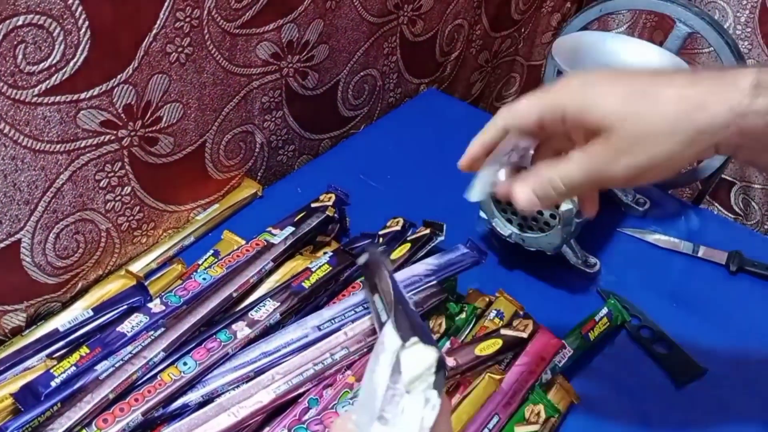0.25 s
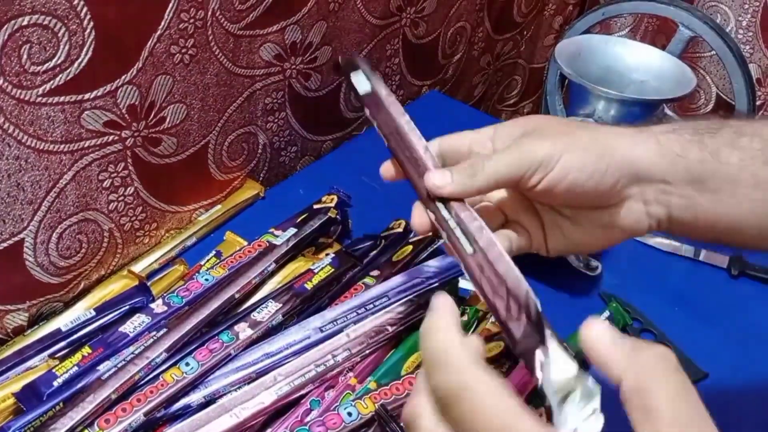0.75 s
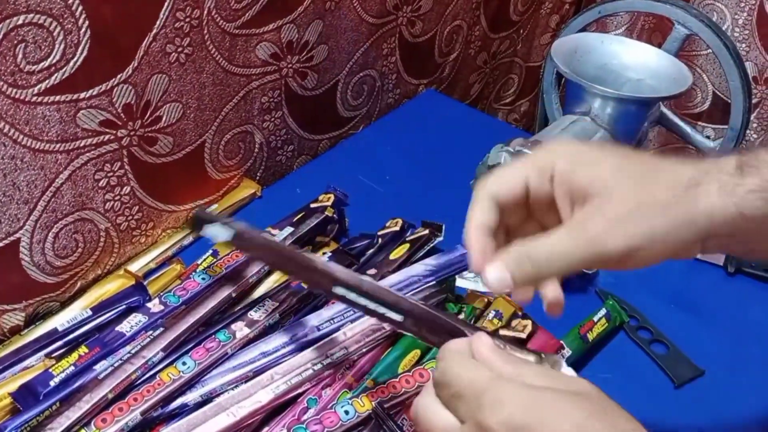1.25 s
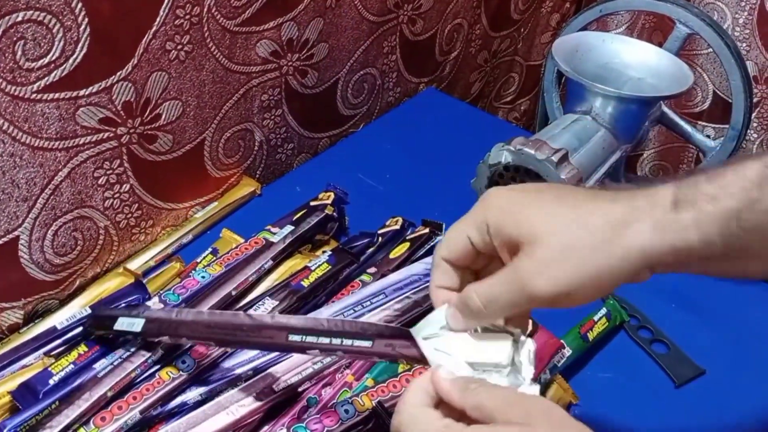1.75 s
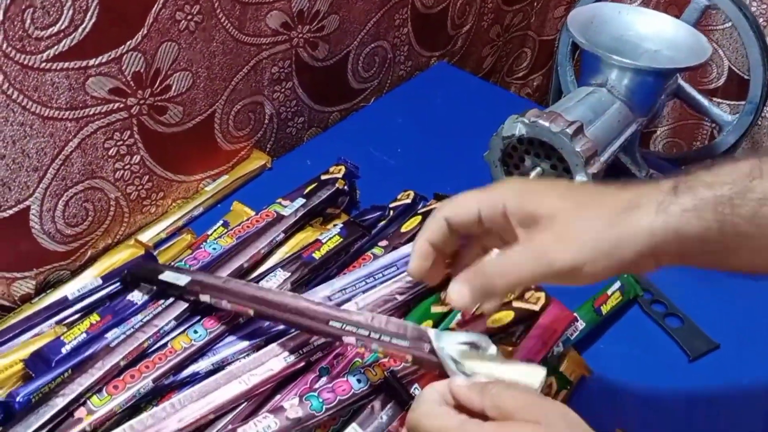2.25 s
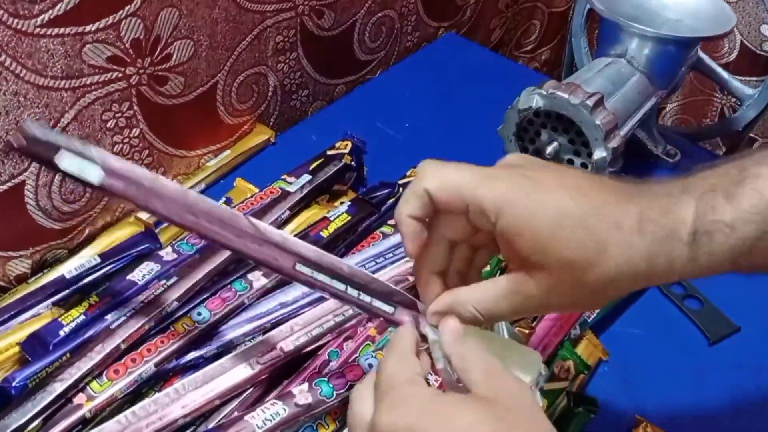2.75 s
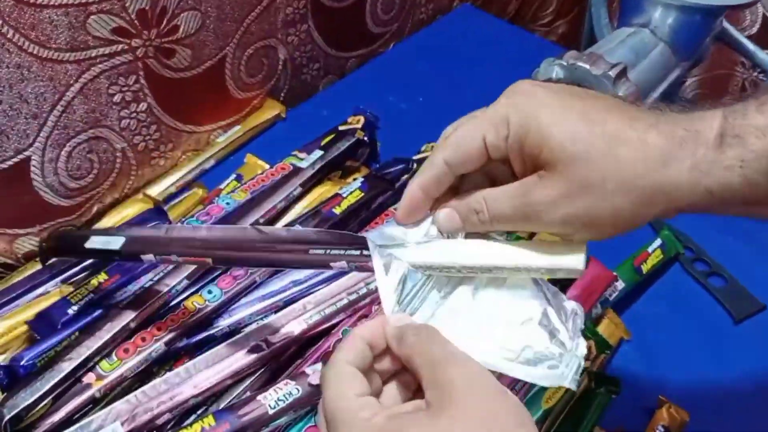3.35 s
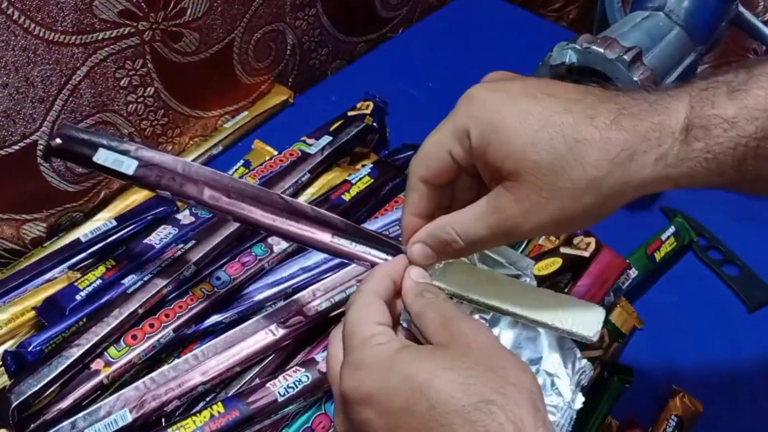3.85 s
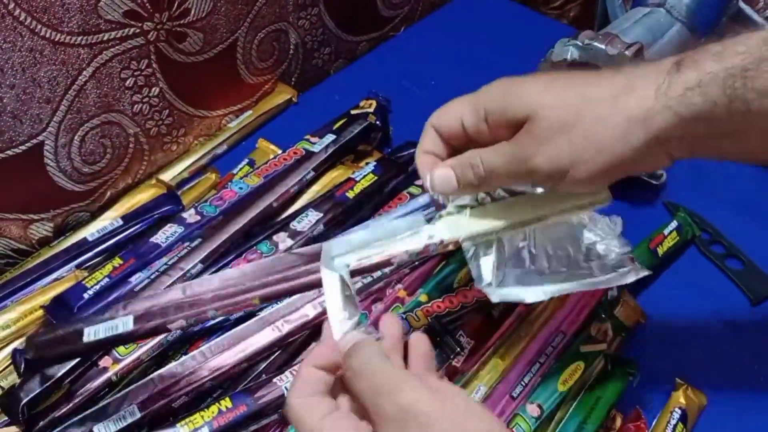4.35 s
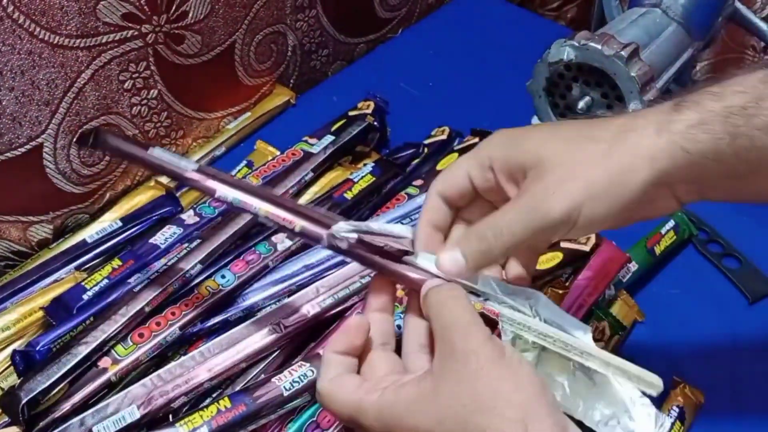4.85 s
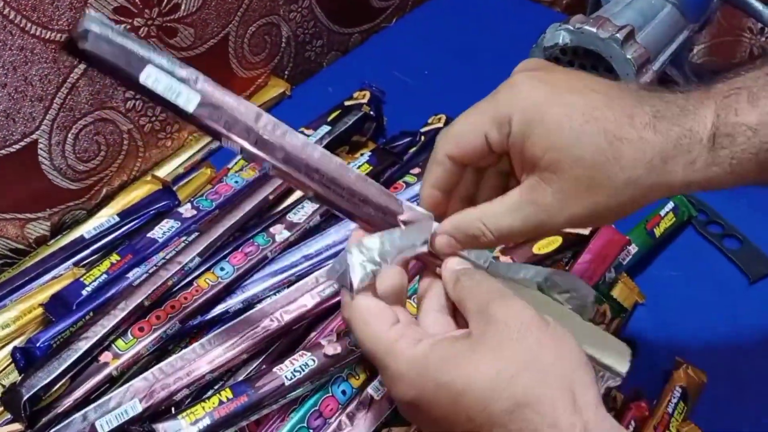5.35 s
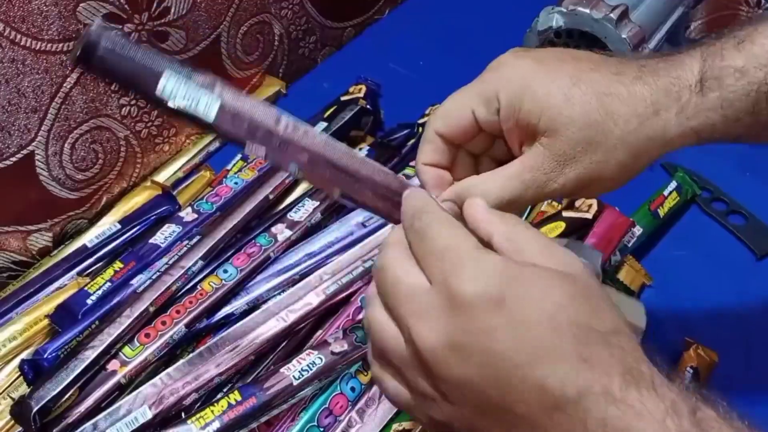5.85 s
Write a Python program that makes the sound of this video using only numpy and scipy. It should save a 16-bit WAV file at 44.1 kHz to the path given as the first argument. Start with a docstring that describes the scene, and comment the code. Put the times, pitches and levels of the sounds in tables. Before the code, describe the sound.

Thin foil snaps, crinkles and rips in uneven handfuls, dry and near. Early crackles are bright and taut; later ones gain a hollow papery flap as the sheet hangs loose. Two strong bursts of tearing fall in the middle, with brief rubbing of fingers between. The end is quiet and sparse, with small bumps and faint squeaks above low room noise.

```python
"""Foil wrapper peeled by hand off a long wafer stick, close to a phone in a small furnished room.
Creases snap as short noise kicks through facet and sheet resonances; pulls and tears release showers
of tiny kicks, and the loose sheet adds a papery body. Behind them an open pouch rings low, fingers
bump and rub as damped swings and soft noise, and faint squeaks are wavering sines.
At the back lie a hum of wavering pitch and level, low rumble and swells, and faint room noise."""
import sys
import numpy as np
from scipy import signal
from scipy.fft import rfft, irfft
from scipy.io import wavfile
from scipy.ndimage import uniform_filter1d, map_coordinates

SR = 44100
rng = np.random.default_rng(int(sys.argv[2]) if len(sys.argv) > 2 else 0)


def unload_wav(signal):
    """Save mono or channel-first audio to the path in sys.argv[1] as 16-bit WAV at rate SR, clipped to [-1, 1]."""
    wavfile.write(
        sys.argv[1],
        SR,
        np.round(np.clip(np.atleast_2d(signal).T, -1, 1) * 32767).astype(np.int16),
    )


N = 269892
T = np.arange(N) / SR  # s


def undb(db):
    """Decibels to gain."""
    return 10 ** (np.asarray(db) / 20)


def unit(x):
    """Scale to rms 1."""
    return x / np.sqrt(np.mean(x ** 2))


def fade(t, t60):
    """Exponential decay, 60 dB down at t60 seconds."""
    return np.exp(-np.log(1000) * t / t60)


def span(start, end, attack_s=0.0095, release_s=0.019):
    """Attack before start, hold, and release after end."""
    return np.interp(T, [start - attack_s, start, end, end + release_s], [0, 1, 1, 0])


def add(out, s, x):
    """Mix x into out from time s on."""
    i = max(int(s * SR), 0)
    out[i:i + len(x)] += x[:max(N - i, 0)]


def convolve(x, response):
    """Filter x, keeping its length."""
    return signal.fftconvolve(x, response)[:len(x)]


def lowpass(order, hz):
    """Butterworth sections that cut the top."""
    return signal.butter(order, hz, fs=SR, output="sos")


def impulse(points, size=512):
    """Minimum-phase response of unit energy with a (f/Hz, level/dB) colour."""
    hz, db = np.transpose(points)
    bins = np.maximum(np.arange(size + 1) * SR / (2 * size), 1)
    gains = undb(np.interp(np.log(bins), np.log(hz), db))
    # folding the cepstrum forward in time makes the response causal
    cepstrum = irfft(np.log(gains))
    cepstrum[1:size] *= 2
    cepstrum[size + 1:] = 0
    h = irfft(np.exp(rfft(cepstrum)))[:size]
    return h / np.linalg.norm(h)


def resonate(x, hz, q):
    """One resonance, gain 1 at its centre."""
    return signal.lfilter(*signal.iirpeak(min(hz, SR / 3), max(q, .5), fs=SR), x)


def resonate_twice(x, hz, q):
    """Two equal resonances in series: a narrow band with a soft onset."""
    return resonate(resonate(x, hz, q), hz, q)


def walk(rate):
    """Smooth random curve of rms 1, with a new target rate times a second."""
    k = int(SR / rate)
    steps = np.repeat(rng.standard_normal(N // k + 1), k)
    return unit(uniform_filter1d(steps, k)[:N])


def buckle(t, skid_db, skid_t60):
    """One crease gives way: a kick, then a brief noisy skid as the fold runs on."""
    push = undb(skid_db) * rng.standard_normal(len(t)) * fade(t, skid_t60)
    push[0] += 1
    return push


def facet_ring(x, hz, q):
    """A stiff facet swells for a cycle or two and rings briefly, in a narrow band."""
    return resonate_twice(x, hz, q)


# papery note of the sheet, which moves as the hands reshape it: t/s, f/Hz
SHEET_NOTE = [(0, 2306), (.11, 2250), (.15, 1598), (.3, 1657), (.5, 2092), (.75, 2100), (.89, 2483),
              (1.25, 1607), (1.4, 2010), (1.5, 1752), (1.75, 1783), (1.95, 1653), (2.3, 1698), (2.6, 1837),
              (2.7, 1600), (2.81, 1810), (3.2, 1751), (3.35, 1631), (3.55, 1546), (3.78, 1701),
              (4.08, 1758), (4.24, 1580), (4.38, 1777), (4.67, 1650), (4.81, 1890), (4.91, 1602),
              (5.13, 1911), (5.8, 1656), (6.12, 1550)]
SHEET_HZ, SHEET_FOLLOW = 1715.6, 1.1  # note at which SHEET holds [Hz]; exponent on the note's ratio to it


def sheet_shift(t):
    """Factor on all resonances of the sheet at time t: bending the foil moves them together."""
    return (np.interp(t, *np.transpose(SHEET_NOTE)) / SHEET_HZ) ** SHEET_FOLLOW


# single creases snapping, loud and faint, close in:
# t/s, level/dB before trim, facet ring f/Hz, body level/dB re ring before trim
SNAPS = [(.0113, -52.5, 5550, -14), (.0919, -39, 4530, -34), (.1138, -38, 6000, -29),
         (.1317, -40.5, 6200, -25), (.1512, -30, 5330, -12.5), (.2517, -44.5, 5500, -30),
         (.2704, -53, 6300, -9), (.4283, -46, 4400, -14), (.4485, -57, 6900, -18),
         (.5148, -46.5, 5500, -21), (.5582, -59, 5200, -26), (.69, -48, 3600, -32), (.748, -46, 5570, -41),
         (.764, -44, 4580, -44), (.7822, -45, 5700, -21), (.8717, -52, 5500, -8), (.8918, -48.5, 5660, -4),
         (.9897, -56, 5200, -22), (1.0696, -49.5, 6600, -25), (1.095, -53, 7000, -20),
         (1.224, -42, 4400, -49), (1.2346, -45, 5000, -11), (1.2465, -45.5, 5500, -30),
         (1.3669, -41.5, 6350, -26.5), (1.4108, -49.5, 6340, -27), (1.4833, -44.5, 4120, -44),
         (1.5053, -36, 5296, -43), (1.5595, -59, 4900, -34), (1.5708, -34.5, 4200, -8.5),
         (1.59, -37, 3940, -13), (1.6187, -41.5, 5860, -32), (1.7084, -45, 4906, -33),
         (1.7238, -47, 5100, -34), (1.8112, -49, 6000, -24), (1.8198, -33, 4730, -24),
         (1.835, -40.5, 5560, -25), (1.852, -42, 5400, -21), (1.858, -38, 5230, -19),
         (1.866, -39, 5500, -13), (1.8737, -36.5, 5990, -16), (1.893, -39, 5120, -24),
         (1.899, -38, 5300, -18), (1.921, -37, 6200, -30), (1.932, -40, 5587, -23),
         (1.939, -34.5, 5040, -14.5), (1.952, -40, 5200, -9.5), (1.966, -39, 5400, -28),
         (1.9949, -32.5, 4670, -9.5), (2.005, -45, 5200, -8), (2.012, -38, 6370, -6.5),
         (2.0797, -33.5, 6100, -7.5), (2.0872, -36.5, 6240, -13), (2.1261, -41, 4330, -22),
         (2.1536, -41.5, 5650, -15), (2.193, -49, 5900, -21), (2.2386, -52, 5300, -22),
         (2.245, -44, 4535, -29), (2.265, -43.5, 5340, -19), (2.272, -41, 6255, -7.5),
         (2.4547, -46.5, 4170, -20), (2.4729, -55, 4840, -22), (2.5422, -48.5, 5300, -5),
         (2.584, -49.5, 3677, -26), (2.6195, -53, 4660, -28), (2.685, -57, 4870, -26),
         (2.69, -36.5, 4610, -5), (2.7897, -43.5, 4323, 2), (2.7959, -42.5, 5480, -15),
         (2.873, -43.5, 5200, -4.5), (2.8785, -49, 5200, -2), (2.8868, -52, 4800, -3),
         (2.9375, -54.5, 4450, -4), (3.0823, -41, 4530, -28), (3.0947, -37.5, 4960, -18),
         (3.1182, -35.5, 5300, -19), (3.1362, -40, 4750, -21), (3.145, -33.5, 5700, -11),
         (3.1618, -32, 5200, -27), (3.1868, -38, 4800, 2), (3.216, -49, 4792, 8), (3.2751, -34.5, 4700, -3),
         (3.2887, -32, 5240, -5.5), (3.3019, -33.5, 5045, -12), (3.3369, -35, 5000, -18),
         (3.3579, -33, 4777, -6), (3.3713, -32, 4600, -7.5), (3.4146, -38.5, 4940, 0.5),
         (3.5424, -41, 4690, -6), (3.561, -46, 4930, -1), (3.5714, -57, 5100, -6), (3.5973, -48, 4900, -10),
         (3.6497, -43.5, 4837, -3.5), (3.694, -63, 4930, -7), (3.7145, -42.5, 4714, -16),
         (3.7323, -39.5, 4800, -32), (3.7599, -40.5, 4510, -24), (3.7796, -38, 5415, -42),
         (3.7935, -41.5, 4970, -5), (3.8074, -33.5, 4635, -3.5), (3.9151, -48, 5100, -33),
         (3.9255, -44, 4840, -30), (3.9361, -46, 5500, -30), (3.974, -47.5, 7220, -23),
         (4.0323, -34.5, 5050, -33), (4.0604, -38, 5647, -12), (4.078, -33, 5100, -26),
         (4.0902, -30.5, 5063, -25), (4.1096, -33.5, 5000, -13.5), (4.137, -35, 5035, -28),
         (4.1825, -32, 5110, -8), (4.2251, -32, 5370, -7), (4.275, -32, 5206, -18),
         (4.2917, -44.5, 5000, -21), (4.3216, -41, 4574, -12), (4.3766, -40.5, 4348, -7.5),
         (4.4161, -43, 4687, -9.5), (4.4274, -53, 4700, -14), (4.5182, -49.5, 4441, -15),
         (4.5442, -53, 4800, -23), (4.5951, -56.5, 5500, -10), (4.566, -45, 4150, -16),
         (4.642, -39.5, 4310, -15), (4.651, -46, 4700, -18), (4.673, -47, 4700, -16),
         (4.6861, -35, 4950, -17), (4.6978, -44, 4700, -13), (4.7967, -43, 4890, -10),
         (4.8205, -58, 4200, -18), (4.8944, -51, 5400, -5), (4.9116, -44, 5267, -5),
         (5.0043, -52, 5400, -28), (5.027, -50, 5000, -10), (5.0455, -48.5, 4700, -7),
         (5.0958, -44.5, 4653, -21), (5.1446, -51, 5194, -6.5), (5.2151, -42.5, 5170, -26),
         (5.2221, -43.5, 5170, -17), (5.265, -54, 5400, -33), (5.279, -53, 5200, -32),
         (5.4843, -48.5, 5500, -15.5), (5.5234, -57.5, 5300, -21), (5.6, -66, 5000, -12),
         (5.621, -69, 4800, 0.5), (5.7521, -48.5, 5805, -10.5), (5.791, -58, 5300, -14),
         (5.806, -49, 5200, -8.5), (5.8188, -54, 4500, -15), (5.9461, -49, 4813, -18),
         (5.9919, -59, 5100, -18), (6.094, -42.5, 5550, -26), (6.104, -46, 5540, -15)]
# colour of the small stiff facets: f/Hz, relative level/dB
FACETS = [(700, -58.5), (1700, -17), (2400, -13), (2800, -5), (3250, -9.5), (4000, -3.5), (5000, -1),
          (6000, -3.5), (7300, -8), (8600, -16.5), (10500, -15.5), (12200, -22), (14000, -16.5),
          (16000, -27)]
# colour of the whole sheet flexing: f/Hz, relative level/dB
SHEET = [(50, -27), (200, -43), (450, -5.5), (750, -12), (1050, -8.5), (1350, 3.5), (1800, 9), (2300, -2.5),
         (2850, 3), (3500, -6), (7000, -31.5)]


def snaps(rows, ring_q=2.28, broad_db=-5, broad_slope=0.19, hard_db=-38, gain_db=-0.65,
          body_gain_db=-0.8, edge_db=1.0, echo_db=-12, echo_s=.003, spread_octaves=0.26,
          size=1024, count=145):
    """Each snap rings its facet, shakes its part of the sheet and trips a neighbouring crease."""
    out, t = np.zeros(N), np.arange(size) / SR
    for s, db, hz, body_db in rows:
        length, sharpness, place, lag, neighbour = rng.standard_normal(5)
        push = buckle(t, skid_db=-13, skid_t60=.007 * np.exp(.4 * length))
        # a sharper crease has more of the highest treble
        colour = [(f, gain + edge_db * sharpness * (f > 8000)) for f, gain in FACETS]
        crack = convolve(push, impulse(colour))
        # hard snaps crack over a wide band, gentle ones mostly ping
        wide_db = broad_db + broad_slope * min(db - hard_db, 0)
        ring = facet_ring(crack, hz, ring_q) + undb(wide_db) * crack
        shift = sheet_shift(s) * 2 ** (spread_octaves * place)
        body = convolve(push, impulse([(f * shift, gain) for f, gain in SHEET]))
        # levels are set over the first few milliseconds (count samples)
        ring = ring / ring[:count].std()
        body = undb(body_db + body_gain_db) * body / body[:count].std()
        add(out, s, undb(db + gain_db) * (ring + body))
        tripped = facet_ring(crack, hz * 2 ** (spread_octaves * neighbour), ring_q)
        tripped_s = s + echo_s * np.exp(.5 * lag)
        add(out, tripped_s, undb(db + echo_db) * tripped / tripped[:count].std())
    return out


# creases running on in a short, dense rip:
# t/s, length/s, level/dB before trim, ring f/Hz, body level/dB re ring before trim
RIPS = [(0.154, 0.0018, -31.5, 5330, -11), (0.701, .005, -52, 5585, -23), (1.054, 0.0061, -54, 6700, -27),
        (2.084, 0.0081, -42.5, 5793, -5), (2.264, 0.0057, -42, 5630, -10.5),
        (3.293, 0.0046, -35.5, 5295, -12), (3.368, .012, -35, 4775, -6), (3.414, 0.0051, -41.5, 4900, 2),
        (4.162, .01, -34.5, 5015, -15.5), (4.269, 0.0078, -35.5, 5103, -4), (5.222, .012, -47, 5200, -8),
        (6.086, .003, -48, 5520, -13)]


def rips(rate=900, each_db=-8.0, scatter_db=2, spread_octaves=0.21):
    """A crease runs on from facet to facet, a snap about every millisecond; rows like SNAPS."""
    rows = []
    for start, length, db, hz, body_db in RIPS:
        for k, (force, facet, lag) in enumerate(rng.standard_normal((20, 3))):
            if k / rate < length:
                s = start + (k + lag / 3) / rate
                ring_hz = hz * 2 ** (spread_octaves * facet)
                rows.append((s, db + each_db + scatter_db * force, ring_hz, body_db))
    return rows


# seam parting in a run of little pops: start t/s, end t/s, level/dB before trim, pops per s, ring f/Hz
PEELS = [(2.804, 2.842, -71, 120, 5060), (3.497, 3.529, -59, 124, 4850), (3.597, 3.637, -64.5, 124, 4925),
         (3.896, 3.943, -56, 115, 5200), (4.012, 4.03, -49.5, 127, 4910)]


def peels(scatter_db=2, jitter=.18, body_db=-17):
    """The seam lets go pop by pop, almost evenly; rows like SNAPS."""
    rows = []
    for s, end, db, rate, hz in PEELS:
        while s < end:
            force, gap = rng.standard_normal(2)
            rows.append((s, db + scatter_db * force, hz, body_db))
            s += np.exp(jitter * gap) / rate
    return rows


# hand moves that tear or crumple the foil:
# start t/s, end t/s, fine crackle level/dB before trim, body level/dB re crackle before trim
PULLS = [(0, 0.08, -59.5, -23), (0.104, 0.226, -52, -16.5), (0.249, 0.292, -57, -12),
         (0.424, 0.5, -66.5, -17), (0.512, 0.518, -68.5, -8.5), (0.708, 0.793, -52, -12.5),
         (0.963, 0.973, -67, -16), (1.044, 1.113, -67, -37), (1.149, 1.297, -65, -24),
         (1.235, 1.256, -53.5, -12.5), (1.362, 1.52, -61, -25), (1.471, 1.524, -57, -9),
         (1.569, 1.649, -52.5, -10.5), (1.708, 1.761, -54.5, -18.5), (1.844, 1.969, -47, -11.5),
         (2.033, 2.131, -50, -6.5), (2.235, 2.324, -49, -11), (2.458, 2.518, -52.5, -14),
         (2.588, 2.64, -57, -14), (2.692, 2.71, -60, -1.5), (2.791, 2.801, -55, -4),
         (2.873, 2.883, -66, -6), (3.002, 3.015, -60.5, -7.5), (3.118, 3.17, -42, -20.5),
         (3.153, 3.19, -42.5, -5), (3.206, 3.28, -46.5, -7), (3.278, 3.405, -43.5, -1.5),
         (3.524, 3.549, -52, -3), (3.718, 3.809, -51, -7.5), (3.911, 4.03, -68.5, -19),
         (4.053, 4.096, -38, -18.5), (4.139, 4.193, -38.5, -9), (4.231, 4.257, -40.5, -4.5),
         (4.29, 4.341, -47, -6.5), (4.375, 4.443, -61, -12.5), (4.564, 4.578, -58, -7),
         (4.645, 4.694, -49, -8), (4.759, 4.931, -62.5, -4), (4.899, 4.916, -57.5, -4.5),
         (5.021, 5.038, -60.5, -5), (5.092, 5.119, -68.5, -3), (5.219, 5.278, -63.5, -15.5),
         (5.482, 5.535, -69.5, -14.5), (5.602, 5.654, -75, -6), (5.75, 5.823, -66, -5.5),
         (5.936, 6.004, -68, -16), (6.059, 6.128, -68.5, -2), (6.081, 6.117, -58, -12)]
GRIP_DB_PER_S, SAG_DB_PER_S, RELEASE_DB_PER_S = 1507, 12.5, 329.5  # take hold, ease, let go
REST_DB, REST_BODY_DB = -83.5, -8.5  # foil that is merely held: crackle, body re crackle, before trim


def effort():
    """Crackle level and relative body in dB: moves rise, sag and die away, and the strongest leads."""
    crackle, body = REST_DB, REST_DB + REST_BODY_DB
    for start, end, db, body_db in PULLS:
        grip = GRIP_DB_PER_S * np.maximum(start - T, 0)
        sag = SAG_DB_PER_S * np.maximum(T - start, 0)
        release = RELEASE_DB_PER_S * np.maximum(T - end, 0)
        shape = db - grip - sag - release
        crackle, body = np.maximum(crackle, shape), np.maximum(body, shape + body_db)
    return crackle, body - crackle


def small_snaps(db, body_db, rate=42, over_db=2, scatter_db=0.5, ring_hz=5200, ring_octaves=0.3,
                less_body_db=-1.5, count=400):
    """Lesser creases give way at uneven gaps, as strongly as the hands pull; rows like SNAPS."""
    gap, force, facet = rng.standard_normal((count, 3)).T
    s = np.cumsum(np.exp(.5 * gap)) / rate
    level = np.interp(s, T, db) + over_db + scatter_db * force
    hz = ring_hz * 2 ** (ring_octaves * facet)
    body = np.interp(s, T, body_db) + less_body_db
    rows = np.transpose([s, level, hz, body])
    return list(rows[s < T[-1]])


def shower(rate, spread_db, even_s=0.032):
    """Random tiny buckles of uneven size, levelled to a roughly steady power; spread_db > 0 makes few strong."""
    sizes = undb(spread_db * np.minimum(rng.exponential(size=N), 4.5)) * rng.choice([-1, 1], N)
    kicks = sizes * (rng.random(N) < rate / SR)
    k = int(even_s * SR / 2)
    power = uniform_filter1d(uniform_filter1d(kicks ** 2, k), k)
    return kicks / np.sqrt(np.maximum(power, 0) + 0.22 * rate / SR)


def crumple(db, body_db, rate=900, facet_q=4.9, broad_db=-10, slide_db=-13, gain_db=-4.0,
            body_gain_db=-1.3, count=9):
    """Harder pulling breaks more creases a second; each lands on a facet of one of several sizes."""
    density = rate * undb(.75 * (np.minimum(db, -42) + 48)) + 90  # buckles per s
    kicks = shower(density, spread_db=1.5)
    facet = rng.integers(0, count, N)
    sizes_hz = np.geomspace(3400, 7900, count)
    rings = sum(facet_ring(kicks * (facet == k), hz, facet_q) for k, hz in enumerate(sizes_hz))
    kicks = kicks + undb(slide_db) * rng.standard_normal(N)  # film slides over film
    crackle = unit(convolve(rings + undb(broad_db) * kicks, impulse(FACETS)))
    body = unit(convolve(kicks * undb(1.75 * rng.standard_normal(N)), impulse(SHEET)))
    # reading the body at a changing speed glides its resonances as the sheet bends
    body = map_coordinates(body, [np.cumsum(sheet_shift(T)) % (N - 1)], order=1)
    return undb(db) * (undb(gain_db) * crackle + undb(body_db + body_gain_db) * body)


# thin high ticks of the tiniest creases: t/s, peak level/dB before room and flexing
TICKS = [(2.8445, -52), (3.05, -46), (3.6485, -58), (5.46, -51), (5.563, -58.5), (5.658, -51),
         (5.7326, -49)]


def ticks(hz=14200, q=4, size=512):
    """The tiniest creases ring only at the very top."""
    out = np.zeros(N)
    for s, db in TICKS:
        ring = resonate(buckle(T[:size], skid_db=11, skid_t60=0.011), hz, q)
        add(out, s, undb(db) * ring / np.abs(ring).max())
    return out


# how taut the foil is held around the stick: t/s, tautness 0-1
TAUT = [(0, 0.97), (.8, 1), (1.5, 1), (2.1, 0.99), (2.6, 0.58), (3.2, 0.03), (4.3, 0.01), (5.2, 0.02),
        (6.12, 0.55)]


def tautness():
    """Tension of the foil over time, 0 slack to 1 taut."""
    return np.interp(T, *np.transpose(TAUT))


def soften(x, db, edge_hz=7000, hard_db=-46, range_db=14, depth=0.32):
    """Slack foil that is handled gently folds rather than cracks, and loses some of its top."""
    gentle = np.clip((hard_db - db) / range_db, 0, 1)
    share = np.clip(depth * (1 - tautness()) * gentle, 0, 1)
    dull = signal.sosfiltfilt(lowpass(3, edge_hz), x)
    return x + share * (dull - x)


# resonances of the taut foil: f/Hz, Q, level/dB before trim
TAUT_MODES = [(1226, 5.1, -6), (2500, 1.65, -4), (8460, 4.35, 6)]


def flex(x, q=18, change_hz=20, gain_db=-2.0, slack_hz=1650, slack_q=2, slack_share=0.14, count=28):
    """Taut foil has resonances of its own; with every new bend narrow modes come forward or drop out."""
    taut = tautness()
    # the hollow note of the sheet needs slack
    x = x - np.clip(slack_share * taut, 0, 1) * resonate(x, slack_hz, slack_q)
    x = x + taut * sum(undb(db) * resonate(x, hz, sharpness) for hz, sharpness, db in TAUT_MODES)
    modes = sum(walk(change_hz) * resonate(x, hz, q) for hz in np.geomspace(700, 9000, count))
    return undb(gain_db) * (x + .42 * modes)


def room(x, tail_db, t60=0.15, early_db=-13, early_t60=0.03):
    """Quick reflections off table and hands, then the short tail of walls that soak up the top."""
    t = T[:SR // 2]
    early = rng.standard_normal(len(t)) * fade(t, early_t60) * (t > .002)
    tail = rng.standard_normal(len(t)) * fade(t, t60) * (t > .007)
    tail = signal.sosfilt(lowpass(2, 9000), tail)
    early = undb(early_db) * early / np.linalg.norm(early)
    tail = undb(tail_db) * tail / np.linalg.norm(tail)
    return x + convolve(x, early + tail)


# low ring of the opened wrapper, a pouch: start t/s, end t/s, level/dB, note f/Hz
POUCH = [(0.26, 0.305, -83.5, 1080), (0.874, 0.943, -79, 417), (1.86, 2.04, -76, 742),
         (2.083, 2.149, -69.5, 474), (2.457, 2.558, -74.5, 677), (2.691, 2.71, -60.5, 717),
         (3.538, 3.578, -67, 505), (4.191, 4.298, -65.5, 402), (4.86, 4.935, -75.5, 565),
         (5.025, 5.067, -76, 478.6), (5.227, 5.296, -80.5, 438), (5.755, 5.839, -80.5, 467)]


def pouch(q=3, rate=400):
    """Tiny buckles ring the low note of the open wrapper, a different one for each shape."""
    kicks = shower(rate, spread_db=-1.0)
    return sum(undb(db) * span(s, end) * unit(resonate_twice(kicks, hz, q)) for s, end, db, hz in POUCH)


def thud(hz, t60, low_edge=0.47, size=2048):
    """A soft contact: a heavily damped swing, peak 1."""
    t = T[:size]
    swing = np.sin(2 * np.pi * hz * t) * fade(t, t60)
    edges = [min(low_edge, 1) * hz, min(3 * hz, SR / 3)]
    swing = signal.sosfilt(signal.butter(2, edges, "bandpass", fs=SR, output="sos"), swing)
    return swing / np.abs(swing).max()


# fingers bumping the stick and the sheet: t/s, peak level/dB, f/Hz, ring time t60/s
BUMPS = [(0.1517, -55, 433, 0.0071), (2.578, -57, 171.3, 0.015), (2.946, -52, 227.1, 0.0082),
         (3.242, -45, 490, 0.0025), (4.763, -47.5, 1916, 0.021), (4.77, -45.5, 2640, 0.013),
         (5.428, -53.5, 1830, 0.012), (5.4282, -44, 306, 0.0084), (5.683, -37.5, 485, 0.0077),
         (5.685, -35.5, 897, 0.0043), (5.6853, -45, 1920, 0.0061)]
# skin sticking and slipping on the wrapper: start t/s, end t/s, level/dB before trim, slips per s
RUBS = [(2.55, 2.633, -58, 91), (2.7372, 2.785, -50.5, 83), (3.0235, 3.102, -51.5, 104.8),
        (3.121, 3.24, -52.5, 95), (4.167, 4.3, -60.5, 89), (5.412, 5.44, -61.5, 98),
        (5.68, 5.696, -58.5, 120)]


def fingers(slip_hz=480, slip_t60=0.0065, slip_edge=0.23, slip_octaves=0.29,
            scrape_db=-20, scrape_hz=650, drag_db=-17, drag_hz=190):
    """Single bumps, and runs of uneven stick-slip over a soft scrape and a dull drag."""
    out = np.zeros(N)
    for s, db, hz, t60 in BUMPS:
        add(out, s, undb(db) * thud(hz, t60))
    noise = rng.standard_normal(N)
    scrape = undb(scrape_db) * unit(resonate_twice(noise, scrape_hz, 1))
    drag = undb(drag_db) * unit(resonate_twice(noise, drag_hz, 1))
    for s, end, db, rate in RUBS:
        out += undb(db) * (scrape + drag) * span(s, end)
        while s < end:
            force, pitch, gap = rng.standard_normal(3)
            slip = thud(slip_hz * 2 ** (slip_octaves * pitch), slip_t60, slip_edge)
            add(out, s, undb(db - 2.0 + 1.4 * force) * slip)
            s += np.exp(.22 * gap) / rate
    return out


# faint squeaks of a fingertip on the film: start t/s, end t/s, level/dB at the top of the swell, f/Hz
SQUEAKS = [(5.55, 5.621, -84.5, 656), (5.834, 5.872, -83, 1046), (5.876, 5.96, -85.5, 689)]


def squeaks(waver=.012):
    """Slips so fast that they fuse into a thin wavering tone, which swells and fades."""
    out, drift = np.zeros(N), 1 + waver * walk(80)
    for s, end, db, hz in SQUEAKS:
        swell = np.sin(np.pi * np.clip((T - s) / (end - s), 0, 1))
        tone = np.sqrt(2) * np.sin(2 * np.pi * hz * np.cumsum(drift) / SR)
        out += undb(db) * swell * tone
    return out


# low hum under the hands: t/s, f/Hz before waver, level/dB before trim and flutter
HUM = [(0, 203, -68.5), (.12, 205, -72.5), (.2, 205, -83), (.32, 205, -71.5), (.38, 205, -80),
       (.47, 210, -68), (.57, 205, -79), (.66, 210, -68.5), (.93, 203, -68), (1.11, 208, -78.5),
       (1.17, 208, -69.5), (1.33, 208, -65.5), (1.42, 207, -76), (1.65, 208, -71.5), (1.73, 205, -86),
       (2.1, 201.5, -90), (2.4, 208.2, -72), (3.1, 200.8, -70.5), (3.8, 187.1, -73), (4.902, 185.1, -77),
       (5.4, 192, -77.5), (6.12, 201, -76.5)]
# soft low swells above the hum in pitch: centre t/s, half width t/s, level/dB, f/Hz
SWELLS = [(.43, .08, -85, 302), (.75, 0.073, -88, 420), (1.049, .07, -73, 283), (1.341, .03, -81, 310.6)]
# colour of the room noise: f/Hz, relative level/dB per Hz
AIR = [(25, -8), (55, -13.5), (100, -14), (160, 2.5), (250, -1), (400, -10.5), (800, -24.5), (2000, -17.5),
       (3200, -13.5), (5000, -22), (10000, -23.5), (16000, -18.5)]


def background(air_db=-82.5, air_waver_db=2.5, waver_hz=9, flutter_db=3.0,
               rumble_hz=165, rumble_q=2.6, rumble_db=-81):
    """A sine hum wavering in pitch and level, with resonant noise as rumble and swells, over room noise."""
    s, hz, db = np.transpose(HUM)
    phase = 2 * np.pi * np.cumsum(np.interp(T, s, hz) + waver_hz * walk(60)) / SR
    noise = rng.standard_normal(N)
    rumble = undb(rumble_db) * unit(resonate_twice(noise, rumble_hz, rumble_q))
    tone = np.sqrt(2) * np.sin(phase) * undb(np.interp(T, s, db) - 3.5)
    hum = (tone + rumble) * undb(flutter_db * walk(30))
    swells = np.zeros(N)
    for centre, width, level, pitch in SWELLS:
        band = unit(resonate(resonate(noise, pitch, 5.0), pitch, 4.5))
        swells += undb(level) * band * np.exp(-((T - centre) / width) ** 2)
    air = convolve(rng.standard_normal(N), impulse(AIR, size=2048))
    return hum + swells + undb(air_db + air_waver_db * walk(13)) * air


def scene():
    """Foil sounds in the room; pouch, fingers, squeaks and background are mixed in without it."""
    db, body_db = effort()
    creases = snaps(list(SNAPS) + small_snaps(db, body_db) + peels() + rips())
    jerky_db = db + 3 * walk(45.33)  # the jerkiness of a move
    foil = soften(creases + crumple(jerky_db, body_db), db)
    foil = flex(room(foil + ticks(), tail_db=-13.5))
    return (foil + pouch() + fingers() + squeaks() + background())[None]


def record(dry, top_hz=15800):
    """The phone cuts the top with a steep low-pass."""
    return signal.sosfilt(signal.ellip(8, .2, 70, top_hz, fs=SR, output="sos"), dry)


dry = scene()
out = record(dry)
unload_wav(out)
```